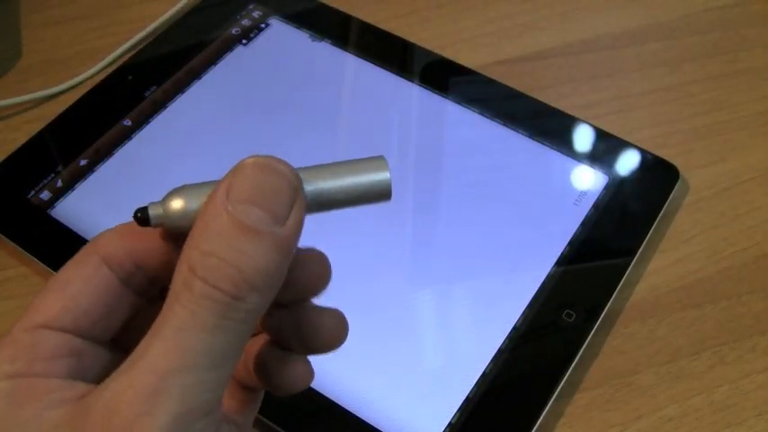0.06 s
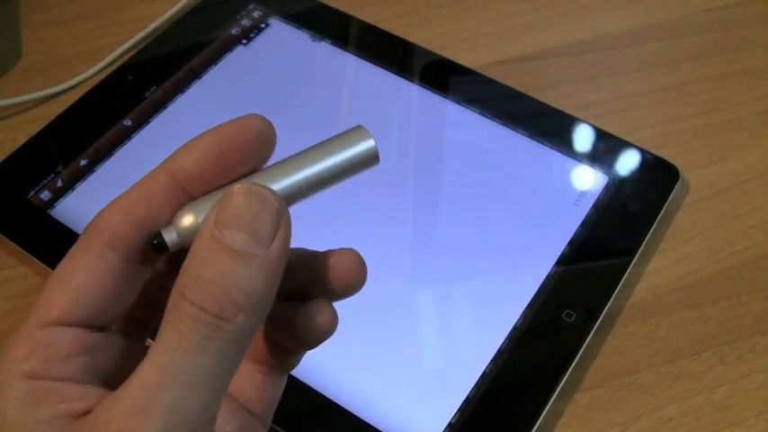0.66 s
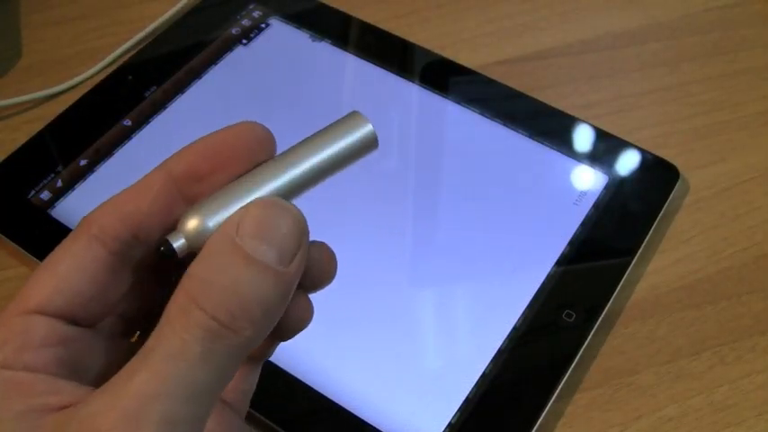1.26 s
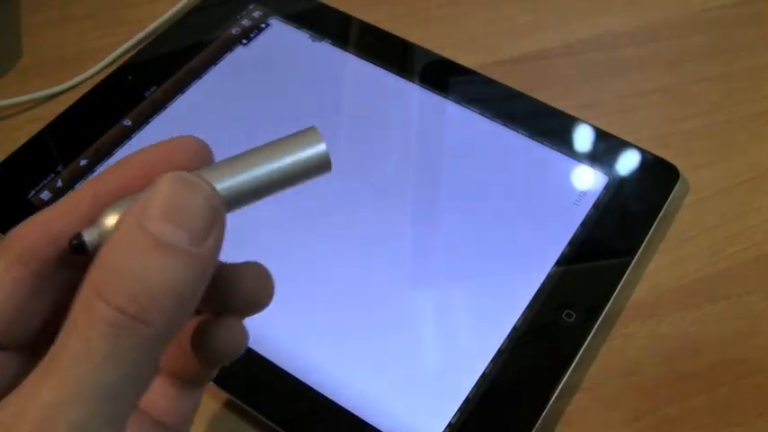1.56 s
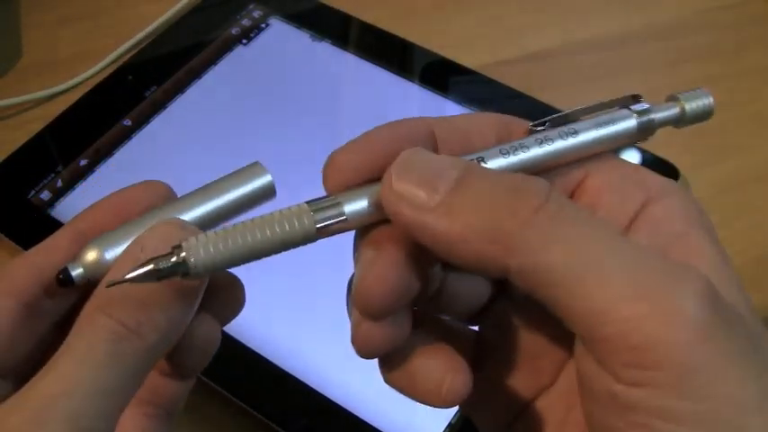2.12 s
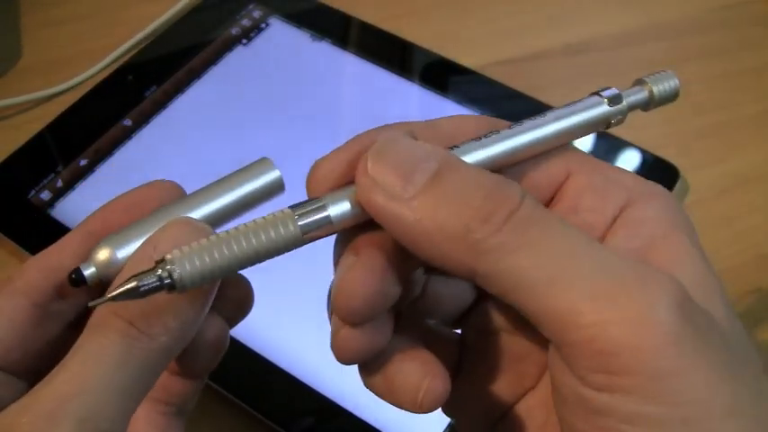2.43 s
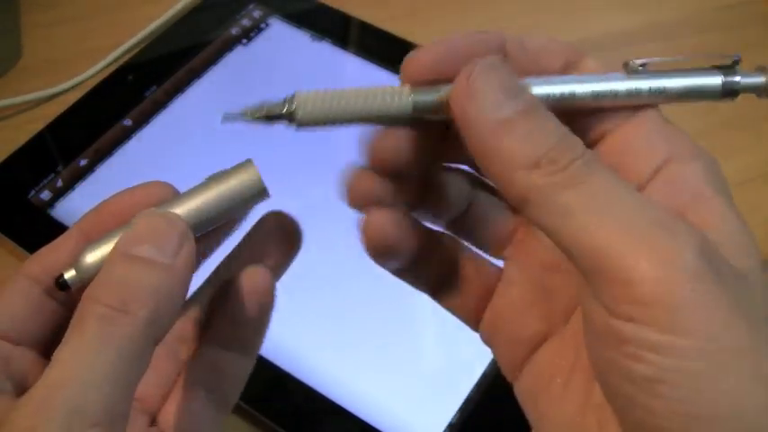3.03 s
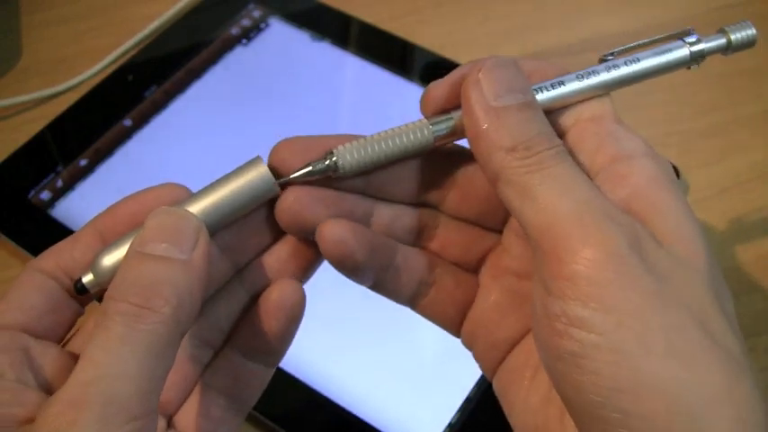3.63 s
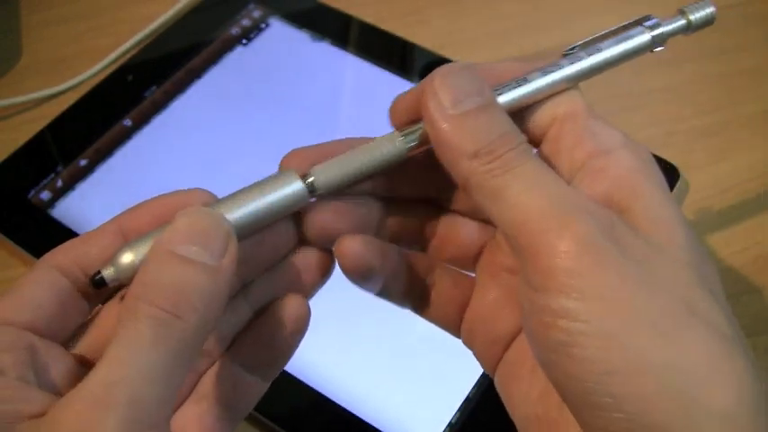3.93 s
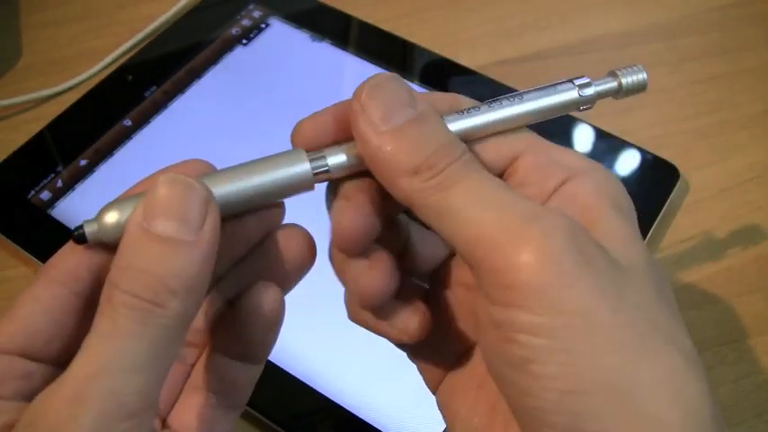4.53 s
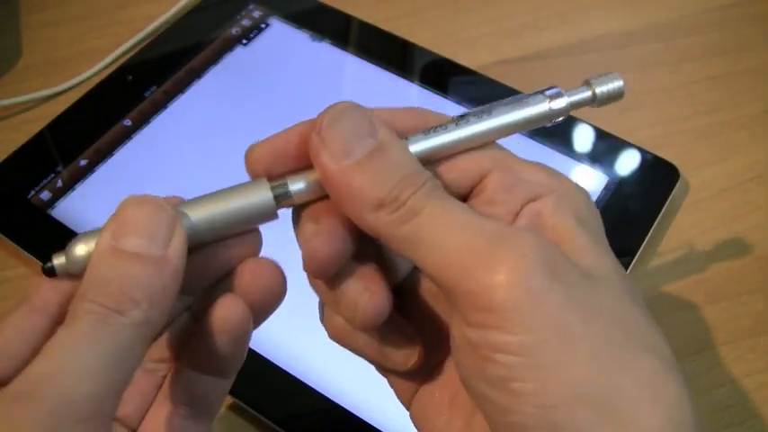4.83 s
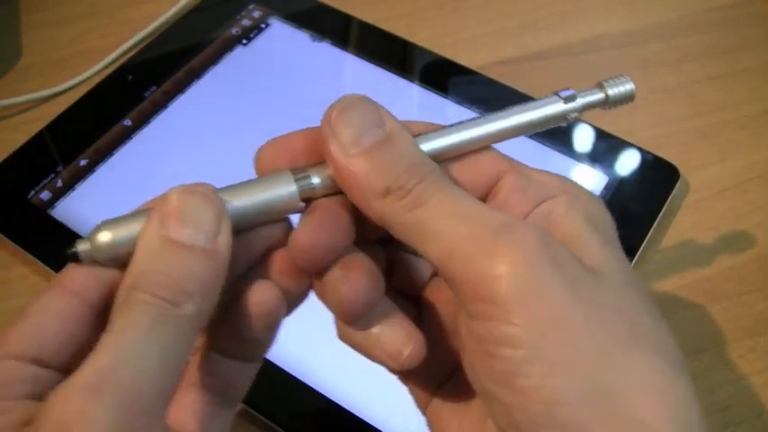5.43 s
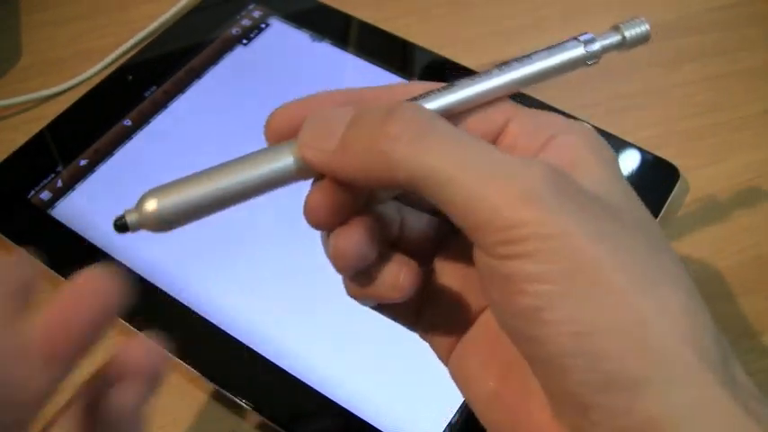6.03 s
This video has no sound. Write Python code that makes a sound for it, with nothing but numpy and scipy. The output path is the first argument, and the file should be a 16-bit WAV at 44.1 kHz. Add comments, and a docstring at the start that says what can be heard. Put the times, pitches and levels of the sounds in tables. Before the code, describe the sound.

Close to the microphone, over low room noise and a thin, faint electronic whine, a loose metal cap gives a few small ticks and a slight squeak. After a pause, a metal pencil tip touches its rim several times. Then comes the loudest moment, a short cluster of sharp, scraping metal clicks as the cap is pushed over the ribbed grip and wedges tight. Afterwards fingers barely brush the metal.

```python
"""A metal stylus cap is pushed onto a metal mechanical pencil, close by, over room noise and a faint whine.
First the loose cap ticks and squeaks as the fingers turn it, and a hand bumps softly. From 3.1 s the
pencil's point feels for the opening; at 4.04 s it strikes the rim, and the cap knocks onto the nose,
ratchets over the ribbed grip in stick-slip and wedges home at 4.22 s. Then fingers rub the metal faintly.
Each impact excites damped modes of the tubes, and desk and walls reflect the sound briefly."""
import sys
import numpy as np
from scipy import signal
from scipy.fft import rfft, irfft
from scipy.io import wavfile

SR = 44100
rng = np.random.default_rng(int(sys.argv[2]) if len(sys.argv) > 2 else 0)


def wrap_up_sound(samples):
    """Save the sound to the file named by the first command line argument, as 16-bit audio."""
    columns = np.atleast_2d(samples).T
    # keep every value between -1 and 1, then stretch to whole-number steps
    tamed = np.clip(columns, -1, 1)
    steps = np.round(tamed * 32767).astype(np.int16)
    wavfile.write(sys.argv[1], SR, steps)


N = 276330
TIME = np.arange(N) / SR


def undb(db):
    """Amplitude ratio of a level in decibels."""
    return 10 ** (np.asarray(db) / 20)


def unit(x):
    """Normalisation to rms 1."""
    return x / np.sqrt(np.mean(x ** 2))


def decay(t, t60):
    """Exponential damping: the level falls 60 dB in t60 seconds."""
    return np.exp(-np.log(1000) * t / t60)


def band(x, hz, kind, order=2):
    """Causal Butterworth filtering: low-, high- or band-pass."""
    return signal.sosfilt(signal.butter(order, np.minimum(hz, .49 * SR), kind, fs=SR, output="sos"), x)


def colour(x, points):
    """Spectral shaping by a curve through points (f/Hz, level/dB)."""
    hz, db = np.transpose(points)
    bins = np.maximum(np.fft.rfftfreq(x.shape[-1], 1 / SR), 1)
    gain = undb(np.interp(np.log(bins), np.log(hz), db))
    return irfft(rfft(x) * gain, x.shape[-1])


def walk(rate_hz):
    """Random fluctuation: interpolated Gaussian values with a spread near 1."""
    knots = rng.standard_normal(int(N / SR * rate_hz) + 2)
    return np.interp(TIME * rate_hz, np.arange(len(knots)), knots)


def stereo_noise(size):
    """Spatial coherence: long waves reach both microphones alike, short ones differ."""
    mid, side = rng.standard_normal((2, size))
    side = undb(-6) * band(side, 5000, "highpass")
    return np.array([mid + side, mid - side])


def tone(hz, tone_db):
    """Modal weighting: place and hardness of a contact set body (low), ping (middle) and edge (high)."""
    body_db, ping_db, edge_db = tone_db
    return np.interp(hz, [1650, 2200, 2950, 3750, 6300], [body_db, 0, 0, ping_db, edge_db])


def ring(t, modes, detune, tone_db, lean_db_per_hz=.00012):
    """Modal superposition: the hold detunes each damped mode a little, and high ones beam to one side."""
    hz, db, t60 = np.transpose(modes)[:, :, None]
    shift, lean = rng.standard_normal((2, len(modes), 1))
    envelopes = undb(db + tone(hz, tone_db)) * decay(t, t60)
    waves = envelopes * np.sin(2 * np.pi * hz * (1 + detune * shift) * t)
    lean_db = lean_db_per_hz * hz * lean
    return np.array([np.sum(waves * undb(ear * lean_db), axis=0) for ear in (1, -1)])


def impacts(events, modes, spectrum, detune, crunch_db, crunch_t60, contact_hz, rise_s=.00001):
    """Impulse response: contact time low-passes the strong modes; crowded weak ones merge to a crunch."""
    out = np.zeros((2, N))
    t = np.arange(6000) / SR
    onset = 1 - np.exp(-t / rise_s)  # a snap lets go more gradually than a strike
    hz, spectrum_db = np.transpose(spectrum)
    for s, db, *tone_db in events:
        blow = band(ring(t, modes, detune, tone_db), contact_hz, "lowpass", order=4) * onset
        blow /= np.max(np.abs(blow.mean(0)))
        # the crowded modes depend less on the place of contact than the strong ones
        weighted = np.transpose([hz, spectrum_db + .5 * tone(hz, tone_db)])
        crunch = unit(colour(stereo_noise(len(t)), weighted)) * onset * decay(t, crunch_t60)
        start = int(s * SR)
        out[:, start:start + len(t)] += undb(db) * (blow + undb(crunch_db) * crunch)
    return out


# relative spectral density of the room noise: f/Hz, level/dB
ROOM_SPECTRUM = [(15, -26), (25, -20), (64, -14), (246, -4), (368, -2.5), (399, -2.5), (445, -1.5),
                 (970, -7), (1800, -11), (3930, -16.5), (4260, -19), (5140, -21), (5580, -20.5),
                 (13900, -28), (15500, -33.5)]
# its side signal relative to its mid signal: f/Hz, level/dB
ROOM_SIDE = [(60, 0), (110, -6), (200, 4.5), (380, 5.5), (700, 4), (1290, 1), (2380, -3), (4400, -2),
             (8120, -1.5), (15000, 0.5)]


def room_noise(level_db=-57.5, waver_db=.6):
    """Diffuse field: soft, slightly wavering noise is only partly coherent between left and right."""
    mid, side = (unit(colour(rng.standard_normal(N), ROOM_SPECTRUM)) for _ in range(2))
    side = colour(side, ROOM_SIDE)
    return np.array([mid + side, mid - side]) * undb(level_db + waver_db * walk(14))


# tones of the electronics: f/Hz, rms level before the swell/dB, share of the swell (0-1)
WHINE_TONES = [(1000, -72.5, 0), (1922, -78, 0), (4965, -80.5, 1)]
# swell of the whine: t/s, level/dB
WHINE_SWELL = [(.1, 6), (.4, 1), (.7, -5), (1.3, 0), (1.5, 6), (1.95, 5.5), (2.08, 0), (2.65, 8.5),
               (2.97, 2), (3.3, 4), (3.9, 7.5), (4.4, 5), (4.63, 0), (4.85, 5), (5.5, 5), (5.9, 1)]


def electronic_whine(drift_hz=15.76, flicker_db=2):
    """Modulation: three thin tones drift in frequency, and the highest also swells and flickers."""
    swell_db = np.interp(TIME, *np.transpose(WHINE_SWELL))
    out = np.zeros(N)
    for hz, db, share in WHINE_TONES:
        phase = 2 * np.pi * np.cumsum(hz + drift_hz * walk(90)) / SR
        level_db = db + share * (swell_db + flicker_db * walk(22))
        out += np.sqrt(2) * undb(level_db) * np.sin(phase)
    return out


# the open cap ticking between the fingers: t/s, level/dB, body/dB, treble/dB
CAP_TICKS = [(.512, -36.5, -11, 5), (0.732, -44, -9, -7), (1.39, -29, -2.5, 4.5), (1.488, -46.5, -8, -23)]
# modes of the open cap: f/Hz, level/dB, t60/s
CAP_MODES = [(1200, -14, .05), (1520, 6.5, 0.075), (3000, -4, 0.038), (3260, 4, .025), (3350, -3, 0.034),
             (5340, 3, 0.019), (5884, -2.5, 0.028), (6680, -11, 0.058), (8200, -10, .035),
             (9500, -12, 0.04), (10660, -16, 0.036), (12500, -13, .025)]
# spectrum of its crowded weak modes: f/Hz, level/dB
CAP_CRUNCH = [(500, -19), (1200, 5), (2000, 2), (3200, -5), (4500, -3), (7500, -16), (10000, -10),
              (16000, -25)]


def cap_ticks(bounce_s=.00066, bounce_db=-7):
    """Free vibration and rebound: the loose cap rings at each tick and bounces once."""
    ticks = [(s + delay, db + drop_db, body_db, treble_db, treble_db)
             for s, db, body_db, treble_db in CAP_TICKS
             for delay, drop_db in ((0, 0), (bounce_s, bounce_db))]
    return impacts(ticks, CAP_MODES, CAP_CRUNCH,
                   detune=.0018, crunch_db=-18, crunch_t60=.047, contact_hz=14000)


# partials of the turning cap's squeak: f/Hz, level/dB
SQUEAK_TONES = [(1416, -70), (1773, -64), (2833, -66)]


def cap_squeak(start_s=.55, length_s=.19, waver=.0043, flutter_db=1.5, rub_db=-64.5):
    """Friction sound: thin, fluttering tones swell and fade over a soft rub as the cap is turned."""
    position = 2 * (TIME - start_s) / length_s - 1
    swell = np.sqrt(np.maximum(1 - position ** 2, 0))
    clock = np.cumsum(1 + waver * walk(116)) / SR  # all partials waver in pitch together
    tones = sum(np.sqrt(2) * undb(db + flutter_db * walk(69.6)) * np.sin(2 * np.pi * hz * clock)
                for hz, db in SQUEAK_TONES)
    rub = unit(band(rng.standard_normal(N), [1200, 2200], "bandpass"))
    return swell * (tones + undb(rub_db) * rub)


# soft bumps of the hands: t/s, level/dB, f/Hz
HAND_BUMPS = [(1.758, -49, 226), (4.054, -47.5, 350), (5.129, -51.5, 366)]


def hand_bumps(rise_s=.0029):
    """Heavy damping: flesh gives a dull thud that dies within a few cycles."""
    out = np.zeros(N)
    for s, db, hz in HAND_BUMPS:
        t = np.maximum(TIME - s, 0)
        envelope = t / rise_s * np.exp(1 - t / rise_s)
        out += undb(db) * envelope * np.sin(2 * np.pi * hz * t)
    return out


# point over rim, cap along pencil, and faint rubs of the fingers on the metal:
# start t/s, end t/s, level/dB, treble/dB
SLIDES = [(3.126, 3.137, -55.5, 4), (3.367, 3.396, -68, -10), (4.071, 4.1, -38.5, -1),
          (4.112, 4.138, -39, 3.5), (4.15, 4.234, -38, -3.5), (4.41, 4.426, -63, -14),
          (4.898, 4.91, -67, -12), (5.705, 5.719, -70, -12)]
# spectrum of the friction as the tube colours it: f/Hz, level/dB
SLIDE_SPECTRUM = [(300, -32), (800, -10), (1500, -5), (1880, -6), (2150, 0), (3000, -2.5), (4800, -1),
                  (7500, -12), (10000, -19), (14000, -20), (16000, -33)]


def scrape(slips_per_s=7000, attack_db_per_s=1100, release_db_per_s=950, stick_db=-9, stick_s=.0022):
    """Sliding friction: dense tiny slips on the metal hiss, dipping as the cap sticks after a snap."""
    slips = (rng.random(N) < slips_per_s / SR) * stereo_noise(N)
    hiss = unit(colour(slips, SLIDE_SPECTRUM))
    treble = colour(hiss, [(2900, -50), (5800, 0)])
    out = np.zeros((2, N))
    for start, end, db, treble_db in SLIDES:
        attack_db = attack_db_per_s * np.maximum(start - TIME, 0)
        release_db = release_db_per_s * np.maximum(TIME - end, 0)
        out += undb(db - attack_db - release_db) * (hiss + (undb(treble_db) - 1) * treble)
    sticking = [(TIME > s) * np.exp(-np.abs(TIME - s) / stick_s) for s, *_ in RIB_SNAPS + SEAT_CLICKS]
    return out * undb(stick_db * np.max(sticking, axis=0))


# the pencil's point touching the rim: t/s, level/dB, body/dB, treble/dB, contact cutoff f/Hz
POINT_TOUCHES = [(3.1347, -34.5, 11, 9, 9000), (3.5803, -32, 1.5, -9, 14000),
                 (3.666, -30, 14.5, -1.5, 15800), (3.9886, -26.5, -15, -2, 8600)]
# modes of the point: f/Hz, level/dB, t60/s
POINT_MODES = [(1160, -2.5, 0.012), (2780, 0, 0.0072), (3530, -2.5, 0.018), (4000, -2, 0.0088),
               (4900, -0.5, 0.0079), (7000, -7, 0.013), (7440, -4.5, 0.0072), (10600, -4, 0.0031),
               (12600, -1.5, 0.0061)]
# spectrum of its crowded weak modes: f/Hz, level/dB
POINT_CRUNCH = [(400, -6), (1000, 6), (2600, 4), (7000, 1), (10000, -19), (13000, -12), (16000, -21)]


def point_touches():
    """Contact hardness sets bandwidth: the bare tip taps the rim brightly, the cone behind it dully."""
    return sum(impacts([(s, db, body_db, treble_db, treble_db)], POINT_MODES, POINT_CRUNCH,
                       detune=.02, crunch_db=-17.5, crunch_t60=.046, contact_hz=cutoff_hz)
               for s, db, body_db, treble_db, cutoff_hz in POINT_TOUCHES)


def microphone_port(x, port_hz=12700, q=5.5, port_db=4.5):
    """Resonance: sound from the bare point rings the left microphone's port in the high treble."""
    left, right = x
    resonance = signal.lfilter(*signal.iirpeak(port_hz, q, fs=SR), left)
    return np.array([left + undb(port_db) * resonance, right])


# the bare point striking the rim, and its faint echo off the desk: t/s, level/dB
RIM_STRIKE_AND_ECHO = [(4.0398, -6), (4.0415, -26)]
# modes of point and rim struck together: f/Hz, level/dB, t60/s
RIM_MODES = [(1000, -25, 0.0068), (1510, -26, .012), (2450, -6, 0.025), (3070, 1, 0.0097), (3560, 3, 0.006),
             (5600, -14, 0.0029), (6700, 6, 0.0043), (7320, 6, 0.0042), (8300, -8, .006), (9300, -8, 0.014),
             (10800, -7, .015), (12800, 4, 0.0034)]
# spectrum of the crowded weak modes, for rim strike and nose knocks alike: f/Hz, level/dB
NOSE_CRUNCH = [(300, -2), (600, -8), (1300, -4.5), (1650, -10), (1900, -1.5), (2400, -5), (4800, -2),
               (8000, -6), (10000, -13.5), (13000, -13), (16000, -18)]


def rim_strike():
    """Hard impact: a very short contact excites high modes, so blow and echo are thin and bright."""
    pulses = [(s, db, 0, 0, 0) for s, db in RIM_STRIKE_AND_ECHO]
    return impacts(pulses, RIM_MODES, NOSE_CRUNCH,
                   detune=.0053, crunch_db=-13.5, crunch_t60=.021, contact_hz=15700)


# the cap knocking onto the nose cone: t/s, level/dB, treble/dB
NOSE_KNOCKS = [(4.0465, -15, -1), (4.050, -15, -2), (4.0558, -11, -1.5), (4.0578, -11, 2.5),
               (4.059, -13, 7), (4.0604, -17, 6)]
# modes of the cap resting on the nose: f/Hz, level/dB, t60/s
NOSE_MODES = [(690, -10, 0.013), (875, -11, 0.022), (1050, -20, 0.014), (1420, -10, 0.011),
              (1610, -0.5, 0.027), (2070, -4.5, 0.024), (2360, -11, 0.0077), (3240, -1, 0.012),
              (3570, -0.5, 0.015), (4050, -1, 0.0038), (4940, -4, 0.024), (6200, 4, 0.013),
              (6960, -1, 0.008), (7700, -8, 0.0066), (9240, -7, 0.013), (10500, -6, .01),
              (13000, -10, 0.0025)]


def nose_knocks(body_db=4, ping_db=3, edge_db=-3):
    """Chatter: repeated impacts on the cone excite the cap's low modes too, and sound full and hollow."""
    knocks = [(s, db, body_db, ping_db + treble_db, edge_db + treble_db)
              for s, db, treble_db in NOSE_KNOCKS]
    return impacts(knocks, NOSE_MODES, NOSE_CRUNCH,
                   detune=.0041, crunch_db=-10.5, crunch_t60=.022, contact_hz=15000)


# the cap snapping over the ribs of the grip: t/s, level/dB, body/dB, ping/dB, edge/dB
RIB_SNAPS = [(4.1083, -13.5, 7, 6, 9), (4.1128, -17.5, 0, 8, 13), (4.1157, -23, 1, 2, 17),
             (4.1188, -16, 2, -6, 8), (4.1220, -18, -3, 11, 9), (4.1298, -13, 0, -6, 3),
             (4.1417, -13.5, 2, -11, -5), (4.1563, -15, -3, 4, -10), (4.1612, -22, 5, 2, 9),
             (4.1642, -21, 0, 12, -3), (4.1782, -19.5, -2, 2, -2), (4.2, -17, -1, 8, -1),
             (4.2036, -19, 2, 20, 15), (4.2075, -21, -4, -1, -6), (4.2096, -19.5, 3, 13, -2),
             (4.2107, -19, -5, 14, 0), (4.2154, -16, 3, 7, -5)]
# modes of the cap clamped on the grip: f/Hz, level/dB, t60/s
GRIP_MODES = [(1000, -18, 0.01), (1520, 3, 0.0076), (2380, -12, 0.031), (2463, 4.5, 0.019),
              (2600, 6, 0.0097), (3000, 8, 0.013), (3360, -3, 0.013), (3910, 0.5, 0.012),
              (4360, 0.5, 0.0087), (5160, -11, 0.009), (6350, -5, 0.01), (7430, -7, 0.012),
              (7950, -8.5, 0.012), (9100, -20, 0.0084), (11900, -21, .004)]
# spectrum of its crowded weak modes: f/Hz, level/dB
GRIP_CRUNCH = [(300, -24), (1000, -15), (1500, 0), (1880, -26), (2300, 4), (3000, 2), (4200, -13),
               (5500, -6), (8000, -18), (9500, -18), (10200, -31), (14000, -22), (16000, -33)]


def rib_snaps(sag_per_s=.2):
    """Stick-slip: each release from a rib rings the tube, a little lower the further the cap has gone."""
    out = np.zeros((2, N))
    first_s = RIB_SNAPS[0][0]
    for snap in RIB_SNAPS:
        pitch = 1 - sag_per_s * (snap[0] - first_s)
        modes = [(hz * pitch, db, t60) for hz, db, t60 in GRIP_MODES]
        out += impacts([snap], modes, GRIP_CRUNCH,
                       detune=.011, crunch_db=-10, crunch_t60=.012, contact_hz=9400, rise_s=.00013)
    return out


# the cap wedging against its stop: t/s, level/dB, body/dB, ping/dB, edge/dB
SEAT_CLICKS = [(4.2216, -19.5, -3, 10, 2), (4.2242, -11, -2, -1, 2.5), (4.2317, -17, 0, 1, -1),
               (4.2355, -22, 0, 7, -2)]
# modes of the cap wedged home: f/Hz, level/dB, t60/s
SEAT_MODES = [(1450, -12, .008), (2270, 1, 0.021), (2550, 1, 0.012), (3050, 2, 0.0088), (3830, 5, 0.0098),
              (4050, 4.5, 0.011), (4530, 5, .008), (4900, -4, 0.011), (6380, -3, 0.01), (6830, -8, 0.012),
              (8450, -4, .007), (9100, -8, 0.0091), (11400, -1, .006)]
# spectrum of its crowded weak modes: f/Hz, level/dB
SEAT_CRUNCH = [(300, -12), (1000, -8), (1500, -10), (1880, -12), (2200, 3), (4200, -2), (5500, -2),
               (9400, -13), (10200, -23), (12000, -17), (16000, -24)]


def seat_clicks():
    """Clamped vibration: wedged tight, the tube clicks with little hollow body left."""
    clicks = impacts(SEAT_CLICKS, SEAT_MODES, SEAT_CRUNCH,
                     detune=.012, crunch_db=-7.5, crunch_t60=.011, contact_hz=10500, rise_s=.0001)
    return band(clicks, 1500, "highpass", order=1)


# lightly damped modes of cap and barrel together: f/Hz, level/dB, t60/s
BARREL_MODES = [(1612, -8, 0.089), (2095, 3, .09), (2280, -2, .16), (2370, -4, 0.082), (3760, -6, .08),
                (4160, -5, 0.072), (4970, -5.5, 0.17), (6360, 3, 0.14), (6487, 0, .09), (7000, 0, .08)]


def barrel_ring(x, ring_db=-25, size=16000):
    """Mechanical coupling: every jolt of the joined tubes also feeds their faint, long-lasting modes."""
    t = np.arange(size) / SR
    tail = sum(undb(db) * decay(t, t60) * np.cos(2 * np.pi * hz * t) for hz, db, t60 in BARREL_MODES)
    response = unit(tail) / np.sqrt(size)
    return x + undb(ring_db) * signal.fftconvolve(x, [response], axes=1)[:, :N]


def desk_echo(x, delay_s=.00205, echo_db=-20, dull_hz=9000):
    """Specular reflection: the hard surface under the hands mirrors every click once."""
    delayed = np.pad(x, ((0, 0), (round(delay_s * SR), 0)))[:, :N]
    return x + undb(echo_db) * band(delayed, dull_hz, "lowpass", order=1)


def room(x, early_db=-17.5, early_t60=.045, late_db=-19, late_t60=.17, dull_hz=12000, size=16000):
    """Reverberation: early reflections off hands and desk, then a short tail from the walls."""
    t = np.arange(size) / SR
    out = x
    for db, t60, delay_s in (early_db, early_t60, .001), (late_db, late_t60, .006):
        echoes = band(stereo_noise(size), dull_hz, "lowpass") * decay(t, t60) * (t > delay_s)
        response = unit(echoes) / np.sqrt(size)
        out = out + undb(db) * signal.fftconvolve(x, response, axes=1)[:, :N]
    return out


def scene():
    """Superposition: the metal sounds and their reflections add to hand bumps, room noise and whine."""
    point = microphone_port(point_touches() + rim_strike())
    loose_cap = cap_ticks() + cap_squeak()
    joined = barrel_ring(nose_knocks() + rib_snaps() + scrape() + seat_clicks())
    # so small a tube radiates hardly any bass
    radiated = band(loose_cap + point + joined, 774, "highpass", order=3)
    return room(desk_echo(radiated)) + hand_bumps() + room_noise() + electronic_whine()


def record(dry, balance_db=-.5, top_hz=15800):
    """Band limiting: the recorder cuts the top, and its left channel is a little weaker."""
    heard = dry * undb(np.array([[balance_db], [-balance_db]]) / 2)
    return signal.sosfilt(signal.ellip(8, .2, 70, top_hz, fs=SR, output="sos"), heard)


dry = scene()
out = record(dry)
wrap_up_sound(out)
```